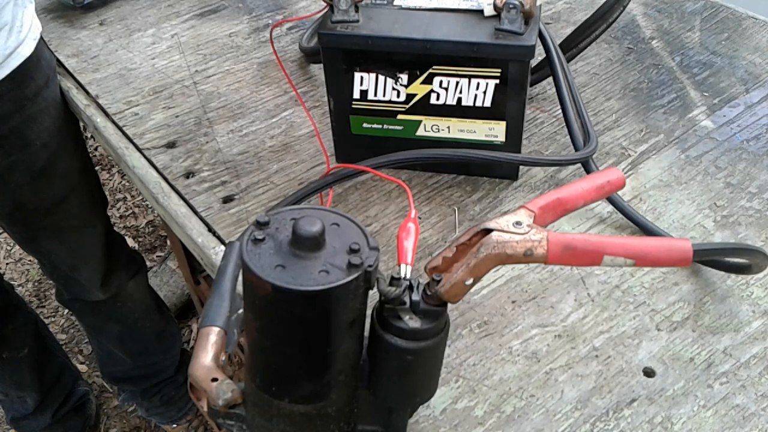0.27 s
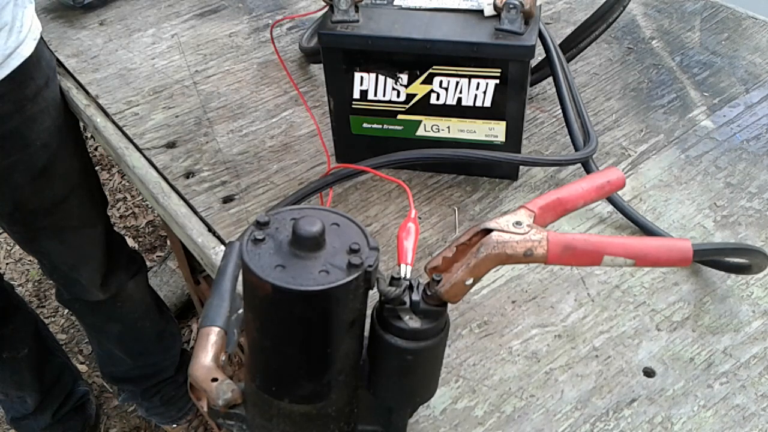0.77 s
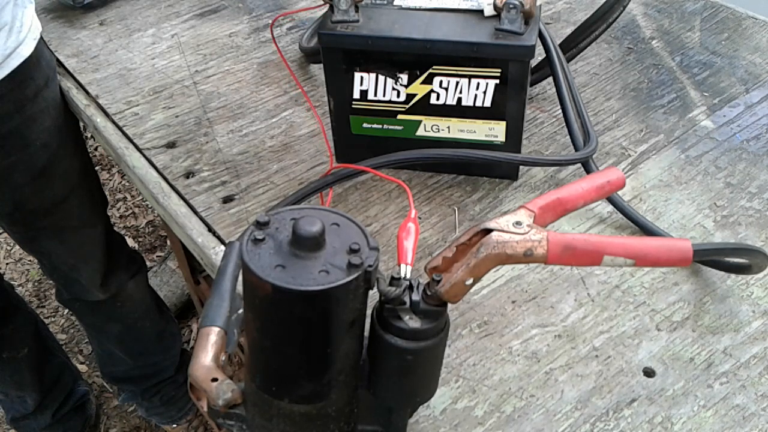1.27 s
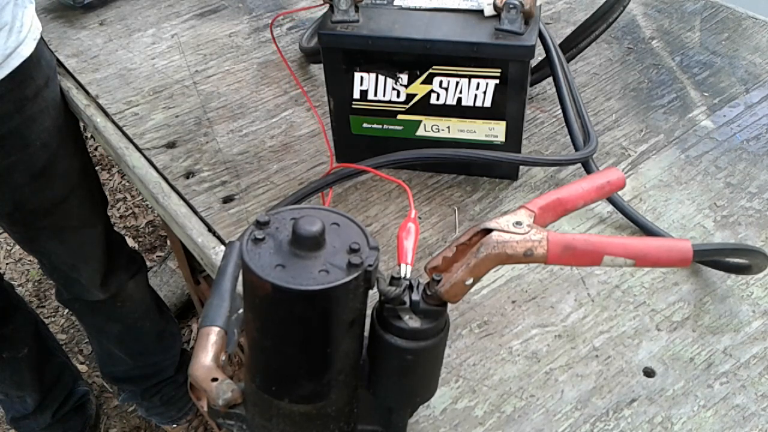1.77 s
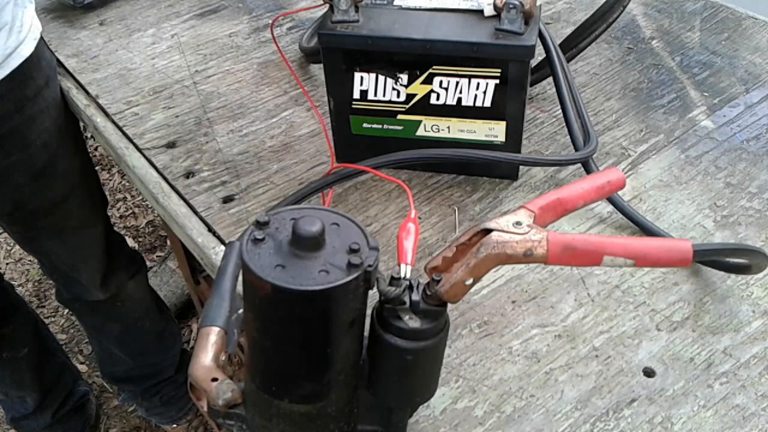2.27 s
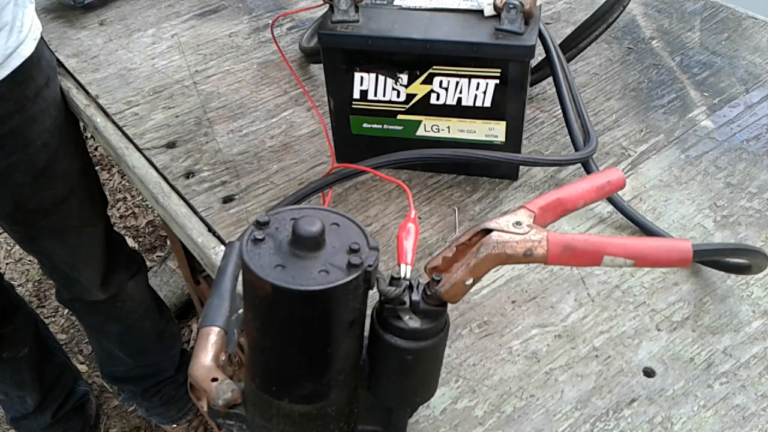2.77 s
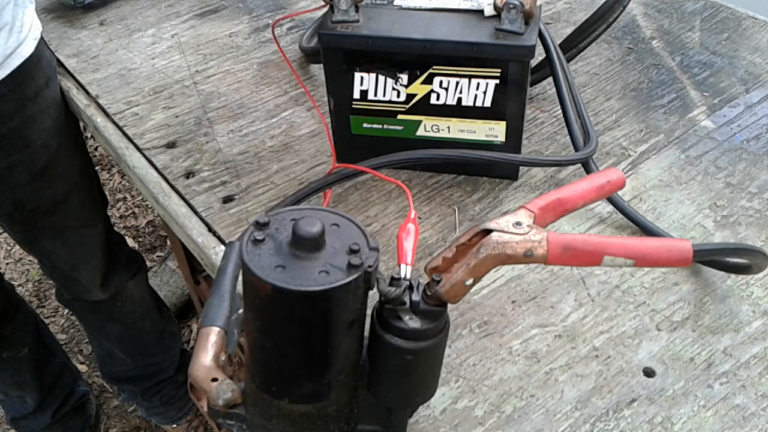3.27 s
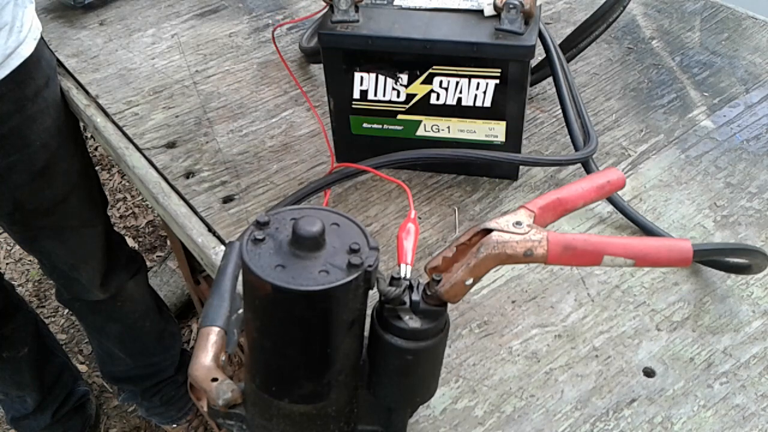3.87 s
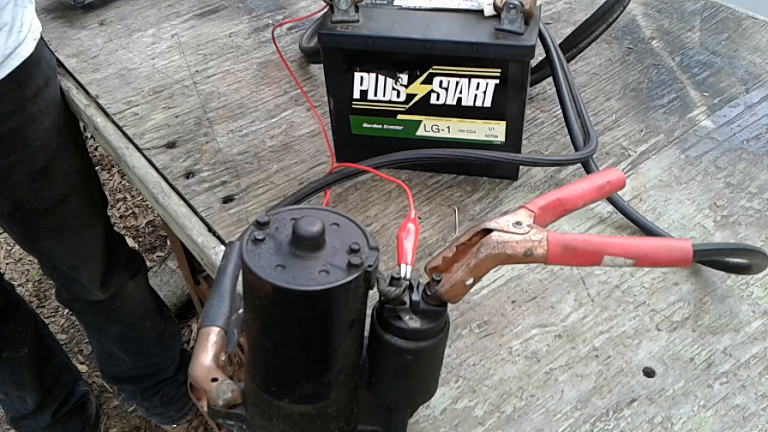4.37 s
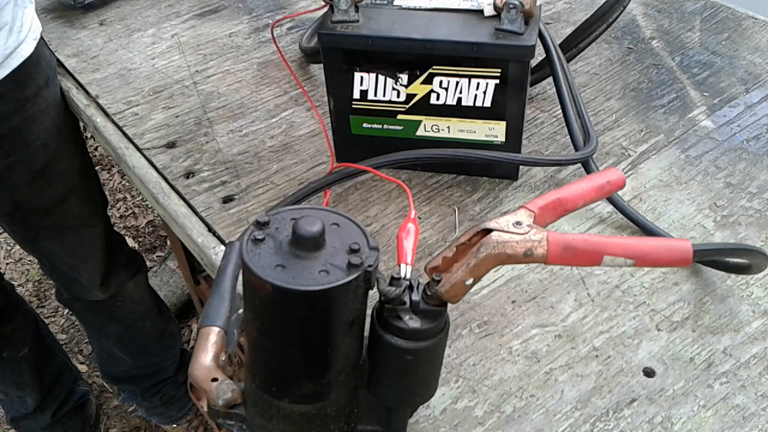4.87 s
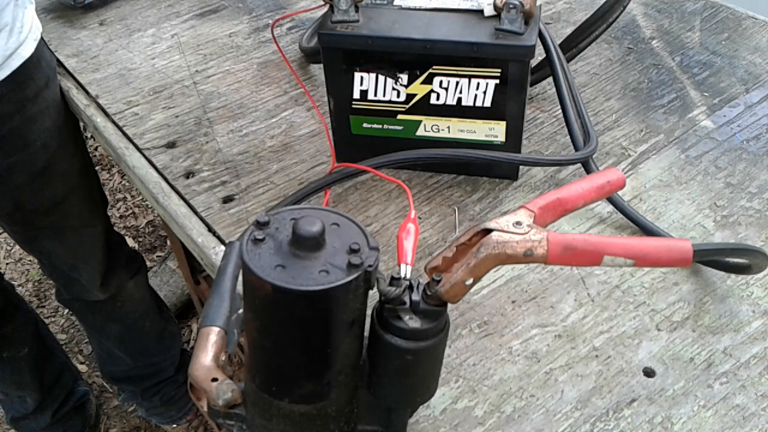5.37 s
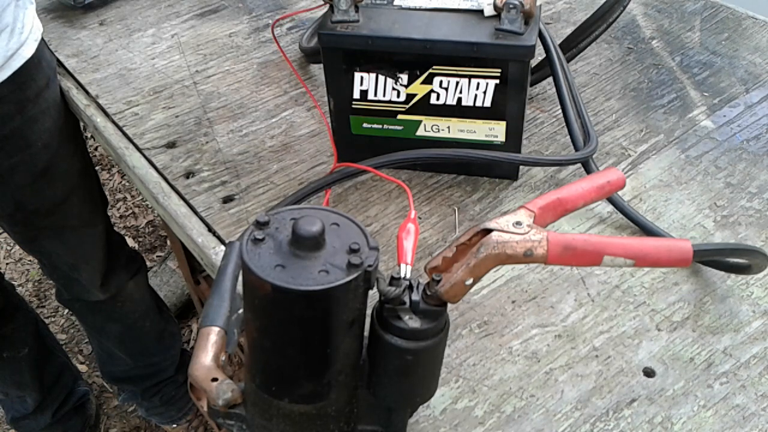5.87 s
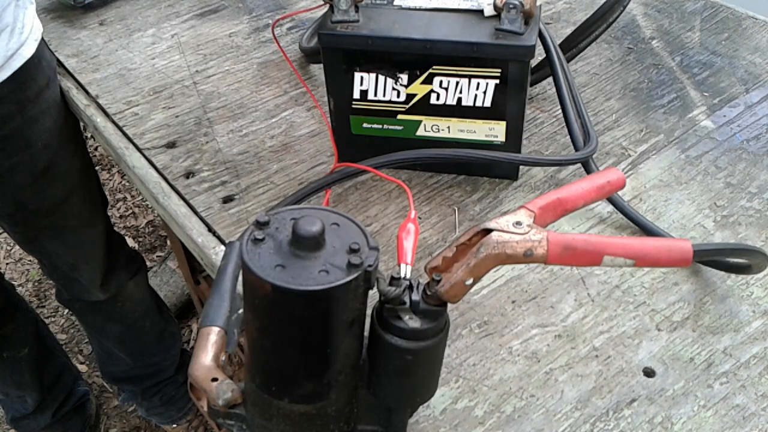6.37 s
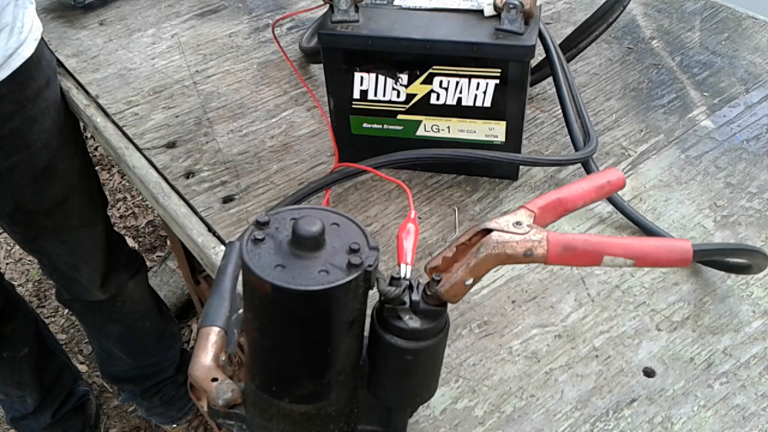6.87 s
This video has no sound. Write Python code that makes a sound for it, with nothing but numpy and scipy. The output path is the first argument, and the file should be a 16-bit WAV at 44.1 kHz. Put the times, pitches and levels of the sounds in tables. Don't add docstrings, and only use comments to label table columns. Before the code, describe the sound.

A bare starter motor on a plywood bench outdoors, heard close in stereo. It coasts down with a falling, scratchy whirr to near quiet. A hard steel clack and bench thump launch a fast-rising whine with brush hiss; another clattering clunk cuts the power and it spins down to rest. A second, shorter run follows and ends with a clunk. Distant traffic hum lies beneath.

```python
import sys
import numpy as np
from scipy import signal
from scipy.fft import rfft, irfft, next_fast_len
from scipy.io import wavfile
from scipy.ndimage import uniform_filter1d

SR = 44100
rng = np.random.default_rng(int(sys.argv[2]) if len(sys.argv) > 2 else 0)


def transcribe(signal):
    frames = np.atleast_2d(signal).T
    limited = np.clip(frames, -1, 1)
    pcm = np.round(limited * 32767).astype(np.int16)
    wavfile.write(sys.argv[1], SR, pcm)


def volts_from_decibels(level):
    exponent = np.asarray(level, float) / 20
    return 10 ** exponent


N = 313531
EDGE_HZ = 15830

# (f/Hz, width/Hz, level/dB)
CASING = [(2040, 33, 3), (2530, 27, -3), (3240, 144, -3), (3807, 345, -2.5), (3913, 130, 0), (2275, 44, 4),
          (4400, 90, -24.5), (5560, 270, -22), (6228, 220, -19)]
# (f/Hz, level/dB)
CASING_BED = [(410, -35.5), (700, -4), (1130, 4.5), (1430, -1.5), (2430, 7.5), (2980, -1), (3840, -6),
              (6260, -16.5), (8000, -27.5), (10400, -68.5), (17600, -120)]
# (f/Hz, level/dB)
BENCH = [(35, -50), (60, -17), (85, -20), (133, -4.5), (183, -14), (215, -7), (339, -5), (428, -2),
         (587, -0.5), (646, -11.5), (702, -3.5), (794, -8.5), (1600, -18), (2080, -43), (3520, -120)]
# (f/Hz, level/dB)
AIR_HISS = [(2940, -20.5), (5000, 4.5), (5380, -1.5), (6250, 10), (6860, 3.5), (9050, -4.5), (13800, -10.5),
            (14800, -8), (16000, -14), (17000, -50.5)]


def evened(x):
    return x / np.sqrt(np.mean(x ** 2) + 1e-20)


def read(points, hz):
    f, value = np.transpose(points)
    return np.interp(np.log(hz + 1), np.log(f + 1), value)


def add(mix, s, sound):
    part = mix[round(s * SR):][:len(sound)]
    part += sound[:len(part)]


def response(points, modes=()):
    hz = np.fft.rfftfreq(4096, 1 / SR)
    power = volts_from_decibels(read(points, hz)) ** 2 + 1e-10
    for f, width_hz, db in modes:
        power = power + volts_from_decibels(db) ** 2 / (1 + (2 * (hz - f) / width_hz) ** 2) ** 2
    log_gain = np.log(np.r_[power, power[-2:0:-1]]) / 2
    taps = np.fft.ifft(np.exp(np.conj(signal.hilbert(log_gain)))).real[:2048]
    return taps / np.linalg.norm(taps)


def drift(rate_hz):
    return evened(signal.lfilter(*signal.butter(2, rate_hz, fs=SR), rng.standard_normal(N)))


def ring(hz, t60, rise_s):
    t = np.arange(8000) / SR
    return np.sin(2 * np.pi * hz * t) * volts_from_decibels(-60 * t / t60) * (1 - np.exp(-t / rise_s))


def rise_and_die(t, t60, rise_s):
    return volts_from_decibels(-60 * t / t60) * (1 - np.exp(-t / rise_s))


def current():
    # (start t/s, end t/s, share of full pull)
    switched = [
        (1.691, 3.227, 1.0),
        (5.680, 6.942, 0.975),
    ]
    t = np.arange(N) / SR
    return sum(share * (t > on) * (t < off) for on, off, share in switched)


def speed_and_turns():
    speed, steps = 95.9, []
    stall_pull, fade_turns_per_s = 1060, 194.8
    drag_dry, drag_oil, drag_air = 120.6, 0.031, 0.001558
    step = 50
    for share in current()[::step].tolist():
        steps.append(speed)
        pull = share * stall_pull / (1 + speed / fade_turns_per_s) ** 2
        drag = drag_dry + drag_oil * speed + drag_air * speed ** 2
        speed = max(speed + (pull - drag) * step / SR, 0)
    speed = np.interp(np.arange(N) / step, np.arange(len(steps)), steps)
    return speed, np.cumsum(speed) / SR


def by_speed(speed):
    # (speed/turns per s, friction level/dB, bench shake rel/dB, air hiss rel/dB, unbalance hum level/dB)
    under_current = [(40, -45, 7.5, -18, -80), (73.6, -39, -1.5, -19.5, -70), (101, -33.5, -6.5, -21, -69),
                     (144.6, -31, -3, -18, -39), (165, -34.5, -4.5, -18, -47),
                     (208.8, -33.5, -3.5, -17, -73.5), (214.4, -31.5, -4, -17, -46),
                     (227.6, -28.5, -5, -17.5, -35.5)]
    coasting = [(4, -63, 8, -27.5, -86), (31.2, -49.5, -3.5, -23, -80), (58.3, -44.5, -2, -18, -59),
                (98, -38, -3, -20, -49.5), (133, -36, -2.5, -18, -39), (156, -34, -3, -18, -44),
                (183, -31, -4.5, -19, -53), (214, -28, -6, -19.5, -72)]
    powered = uniform_filter1d(1. * (current() > 0), size=2000)
    on, off = np.transpose(under_current), np.transpose(coasting)
    levels = []
    for on_db, off_db in zip(on[1:], off[1:]):
        driven = np.interp(speed, on[0], on_db)
        free = np.interp(speed, off[0], off_db)
        levels.append(powered * driven + (1 - powered) * free)
    return powered, levels


def motor():
    # (multiple, coasting level/dB, powered level/dB)
    orders = [(13, -17, -19), (28, 0, 0), (34, -17, -24), (35, -6, -22), (41, -17, -19), (49, -17, -20),
              (54, -19, -20), (56, -6.5, -17), (63, -21, -22), (84, -28, -26)]
    # (f/Hz, level/dB)
    song = [(600, -75), (1950, -58), (2270, -39), (2480, -48), (2700, -37), (2960, -46), (3200, -41),
            (3900, -45), (4200, -56), (4650, -53), (5700, -54), (6300, -63), (14000, -68)]
    # (f/Hz, level/dB)
    magnetic = [(1500, -60), (2050, -46), (2760, -25), (3190, -37), (3460, -55), (3720, -37), (3950, -38),
                (4250, -51), (5000, -68), (5450, -54), (5800, -49), (6150, -62), (14000, -62)]
    speed, turns = speed_and_turns()
    powered, levels = by_speed(speed)
    out = volts_from_decibels(levels[-1] + 0.67 * drift(16.0)) * np.cos(2 * np.pi * turns) * (speed > 0)
    waver_db = 3.2 * drift(30)
    for k, coasting_db, powered_db in orders:
        hz = k * speed
        free_db = read(song, hz) + coasting_db
        pulled_db = read(magnetic, hz) + powered_db
        free_db -= 10 * (k > 28) * abs(np.log2((hz + 1) / 3700))
        level_db = free_db + powered * (pulled_db - free_db)
        level_db += (1 - .7 * powered) * np.roll(waver_db, shift=int(k) * 3000)
        tone = np.cos(2 * np.pi * (k * turns + rng.random()))
        out += np.sqrt(2) * volts_from_decibels(level_db) * tone * (hz < EDGE_HZ) * (speed > 0)
    return out


def brushes():
    speed, turns = speed_and_turns()
    friction_db, shake_db, hiss_db, _ = by_speed(speed)[1]
    scratches = np.diff(rng.standard_normal(257))
    wear = evened(np.interp(turns % 1, np.linspace(0, 1, 256), scratches))
    play_db = 2.8 * np.clip(1 - speed / 150, 0, 1) * drift(50)
    grit = volts_from_decibels(1.8 * drift(405) + 0.94 * drift(28) + play_db)
    rub = evened((.9 * rng.standard_normal(N) + .3 * wear) * grit)
    softer_bed = [(f, db - 5.0) for f, db in CASING_BED]
    body = signal.oaconvolve(rub, response(softer_bed, CASING))[:N]
    bench = signal.oaconvolve(rng.standard_normal(N) * grit, response(BENCH))[:N]
    air = signal.oaconvolve(rub, response(AIR_HISS))[:N]
    turning = np.clip(speed / 8, 0, 1)
    return turning * volts_from_decibels(friction_db) * (body + volts_from_decibels(shake_db) * bench + volts_from_decibels(hiss_db) * air)


def blows():
    # (t/s, peak level/dB)
    pulls = [
        [(1.6664, -47), (1.6722, -29), (1.6778, -15), (1.6817, -16.5), (1.6885, -4.5), (1.6934, -9),
         (1.699, -23), (1.7096, -16), (1.7172, -18.5)],
        [(5.661, -43), (5.665, -30), (5.6711, -20.5), (5.6744, -20.5), (5.6813, -3), (5.6867, -9),
         (5.6917, -11), (5.7, -25), (5.7106, -12)],
    ]
    # (t/s, peak level/dB)
    drops = [
        [(3.2106, -28), (3.2228, -9.5), (3.2285, -14.5), (3.2367, -11.5), (3.248, -4.5), (3.2599, -20),
         (3.279, -8), (3.3034, -26)],
        [(6.9335, -36), (6.9461, -11.5), (6.9486, -25), (6.9614, -13.5), (6.9715, -5.5), (6.986, -16),
         (7.0043, -12), (7.024, -28)],
    ]
    # (ring f/Hz, share near 4 kHz level/dB, treble level/dB)
    pull_in = [(2200, -5.5, -33), (1935, -15, -26), (1870, -3.5, -17), (2040, -25, -13), (2037, -29, -12),
               (1842, -18, -15), (1990, -30, -34), (1880, -13, -8), (2030, -32, -23)]
    drop_out = [(2070, -10, -7), (2030, -16, -20), (1890, -3, -15), (2340, -14, -26), (2147, -13, -21),
                (2320, -38, -33), (1830, -28, -25), (2140, -11.5, -27)]
    hits = []
    for strokes, colours in ((pulls, pull_in), (drops, drop_out)):
        for stroke in strokes:
            hits += [(*hit, *colour) for hit, colour in zip(stroke, colours)]
    return hits


def solenoid():
    # (f/Hz, level/dB)
    crack_points = [(2000, 0), (3000, 7.5), (5000, -0.5), (7000, -4), (10000, -17), (13000, -8),
                    (15500, -24), (17000, -64)]
    # (t/s, peak level/dB, f/Hz)
    thumps = [(1.691, -14.5, 339), (1.699, -16, 165), (1.708, -17, 110), (3.22, -11, 136), (3.23, -11, 138),
              (3.255, -15, 130), (5.685, -11.5, 327), (5.691, -11, 139), (5.702, -15, 234),
              (6.946, -9.5, 220), (6.955, -12.5, 137), (6.968, -23, 115)]
    out, t = np.zeros(N), np.arange(8000) / SR
    hits = blows()
    chance = rng.standard_normal((len(hits), len(t)))
    crack, casing = response(crack_points), response(CASING_BED, CASING)
    bench, air = response(BENCH), response(AIR_HISS)
    for (s, db, hz, mid_db, treble_db), noise in zip(hits, chance):
        plunger = ring(hz, 0.015, 0.0004) + 0.32 * ring(hz * .9, 0.042, 0.00028)
        plunger += 0.2 * ring(1084, 0.043, 0.00073) + 0.5 * ring(1500, 0.0042, .0001)
        plunger += 0.12 * ring(783, 0.031, 0.00061)
        cap = ring(3944, 0.02, 0.0005) + 0.19 * ring(4110, 0.02, .0004) + 0.24 * ring(2740, 0.011, .0004)
        cap *= volts_from_decibels(mid_db + 4)
        burst = signal.oaconvolve(noise * rise_and_die(t, 0.0096, 0.00043), crack)[:len(t)]
        treble = volts_from_decibels(treble_db + 10.5) * (0.88 * ring(6250, 0.013, 0.00052) + 0.87 * burst)
        tick = 0.066 * volts_from_decibels(db) * (ring(10400, 0.0033, .0001) + 0.28 * noise * volts_from_decibels(-60 * t / 0.0036))
        rattle = noise * rise_and_die(t, 0.06, 0.00017)
        wash = 0.27 * signal.oaconvolve(rattle, casing)[:len(t)]
        wash += 0.14 * signal.oaconvolve(rattle, bench)[:len(t)]
        wash += 0.018 * signal.oaconvolve(rattle, air)[:len(t)]
        add(out, s + 0.00034, volts_from_decibels(db) * (plunger + cap + treble + wash + tick))
    for s, db, hz in thumps:
        board = ring(hz, 0.058, 0.0073) + .5 * ring(130.6, 0.087, 0.00537) + 0.31 * ring(262.4, 0.19, 0.0037)
        add(out, s, -volts_from_decibels(db) * board)
    return out


def pinion():
    # (t/s, peak level/dB)
    knocks = [(0.256, -22.5), (0.282, -27), (0.34, -28), (0.4678, -39), (0.6394, -57), (1.9686, -14.5),
              (2.064, -14.5), (2.0934, -13.5), (2.425, -27), (2.8968, -15), (3.4813, -14), (3.5474, -15),
              (4.1937, -18), (4.2382, -25), (4.418, -25), (6.1796, -21), (6.328, -16), (6.3769, -17)]
    out, t = np.zeros(N), np.arange(2000) / SR
    casing = response(CASING_BED, CASING)
    tones = ring(2244, 0.032, 0.00074) + 0.53 * ring(1102, 0.029, .0008) + .5 * ring(3916, 0.028, 0.00088)
    for s, db in knocks:
        noise = rng.standard_normal(len(t))
        knock = signal.oaconvolve(noise * volts_from_decibels(-60 * t / 0.026), casing)
        knock[:len(t)] += tones[:len(t)]
        add(out, s, volts_from_decibels(db - 4.5) * knock / abs(knock).max())
    return out


def ports(x, other, tones):
    # (f/Hz, phase/rad)
    lead = [(0, 0), (860, 0.63), (2930, 2), (4910, 2), (8600, 6), (16400, 13.5)]
    # (f/Hz, level/dB)
    tilt = [(60, -2), (110, -2.5), (200, -2), (380, -3), (700, 1.5), (1290, 0.5), (2380, -3.5), (4400, 17),
            (8120, 5), (15000, 2)]
    # (f/Hz, level/dB)
    far_end = [(60, -24), (300, -38), (700, -5.5), (1500, -25), (3000, -9.5), (5000, -4.5), (9000, 4),
               (15000, -7.5)]
    size = next_fast_len(N + 8192)
    hz = np.fft.rfftfreq(size, 1 / SR)
    half = volts_from_decibels(read(tilt, hz) / 2) * np.exp(.5j * np.interp(hz, *np.transpose(lead)))
    t = np.arange(3000) / SR
    taps = rng.choice([-1., 1.], (2, 3000)) * (rng.random((2, 3000)) < .06)
    taps = taps * volts_from_decibels(-60 * t / 0.02) * (t > .0012)
    taps = signal.lfilter(*signal.butter(1, 500, "high", fs=SR), taps)
    echo = rfft(volts_from_decibels(-14) * taps / np.linalg.norm(taps, axis=1, keepdims=True), size)
    unlike = volts_from_decibels(read(far_end, hz)) * rfft(other, size) * np.array([[1], [-1]])
    heard = (rfft(x, size) + unlike) * (1 + echo) + rfft(tones, size)
    return irfft(heard * np.array([half, 1 / half]), size)[:, :N]


def yard():
    # (f/Hz, level/dB)
    colour = [(18, -39), (30, -39), (129, -2.5), (204, -15), (229, -6.5), (443, -15), (582, -12.5),
              (715, -18.5), (783, -17.5), (839, -21.5), (898, -13.5), (4240, -29.5), (7000, -52.5),
              (9100, -74), (15400, -120)]
    # (f/Hz, likeness from -1 to 1)
    likeness = [(60, 0.77), (180, 1), (550, 0.12), (1650, -0.077), (4970, -0.34), (15000, 0.86)]
    # (f/Hz, level/dB)
    sides = [(60, -0.5), (180, -2), (550, -2.5), (1650, -2.5), (4970, 4.5), (15000, -9)]
    # (t/s, level/dB)
    traffic = [(0.6, 2), (1.0, 2), (1.25, 0.5), (1.65, 0.5), (4.8, -0.5), (5.2, -2.5), (5.65, -1)]
    # (f/Hz, level/dB)
    hum_lines = [(129.2, -57.5), (764.4, -68), (882.9, -69), (4124, -80)]
    # (t/s, f/Hz, level/dB)
    chirp = [(5.05, 3450, -78), (5.09, 3300, -68), (5.13, 3230, -66), (5.16, 3400, -78)]
    frames, hz = N // 256 + 5, np.fft.rfftfreq(1024, 1 / SR)
    a, b, c, d, patches = rng.standard_normal((frames, 513, 5)).T
    patches = evened(uniform_filter1d(uniform_filter1d(patches, 8, 0), 14, 1))
    tilt_db = read(sides, hz)[:, None] / 2
    same = np.clip(read(likeness, hz), -1, 1)[:, None]
    left = a + 1j * b
    right = same * left + np.sqrt(1 - same ** 2) * (c + 1j * d)
    z = np.array([left * volts_from_decibels(tilt_db), right * volts_from_decibels(-tilt_db)])
    z *= volts_from_decibels(read(colour, hz)[:, None] + 1.95 * patches)
    passing_db = np.interp(np.arange(frames) * 256 / SR, *np.transpose(traffic))
    z *= volts_from_decibels(passing_db * np.clip(hz / 600, 0, 1)[:, None])
    bed = volts_from_decibels(-50) * evened(signal.istft(z, nperseg=1024, noverlap=768)[1][:, :N])
    t = np.arange(N) / SR
    hum = sum(volts_from_decibels(db + 0.5 + 2.0 * drift(3.8)) * np.sin(2 * np.pi * f * t) for f, db in hum_lines)
    bird_s, bird_f, bird_level = np.transpose(chirp)
    bird_hz, bird_db = np.interp(t, bird_s, bird_f), np.interp(t, bird_s, bird_level)
    bird = volts_from_decibels(bird_db) * np.sin(2 * np.pi * np.cumsum(bird_hz) / SR) * (t > bird_s[0]) * (t < bird_s[-1])
    return bed + hum + bird * volts_from_decibels(np.array([[3], [-4]]))


def breeze():
    wind_band = signal.butter(2, [40, 90], "band", fs=SR, output="sos")
    low = evened(signal.sosfilt(wind_band, rng.standard_normal(N)))
    wind = volts_from_decibels(-65 + 3 * drift(2.0)) * low
    return wind + volts_from_decibels(-69) * rng.standard_normal((2, N))


def band_limited(x):
    return signal.oaconvolve(x, signal.firwin(511, EDGE_HZ, window=("kaiser", 9), fs=SR)[None], "same")


def scene():
    hits = solenoid()
    near = band_limited((brushes() + pinion())[None])[0] + hits
    far = band_limited(brushes()[None])[0] + 0.42 * np.roll(hits, shift=60)
    return ports(near, far, motor()) + band_limited(yard() + breeze())


def low_pass(x):
    return signal.sosfilt(signal.butter(12, 16810, fs=SR, output="sos"), x)


def record(dry):
    thin = signal.lfilter(*signal.butter(2, 45, "high", fs=SR), dry)
    thin = signal.sosfilt(signal.butter(8, 16200, fs=SR, output="sos"), thin)
    return low_pass(np.tanh(thin / .95) * .95)


dry = scene()
out = record(dry)
transcribe(out)
```